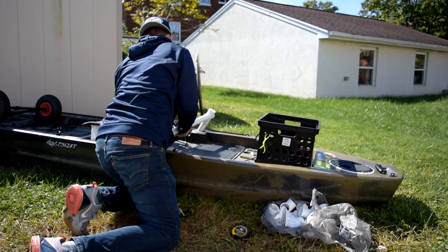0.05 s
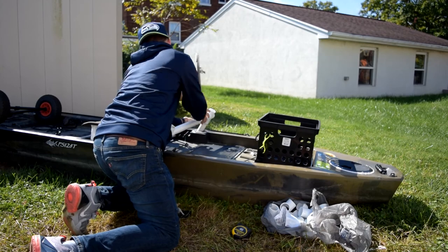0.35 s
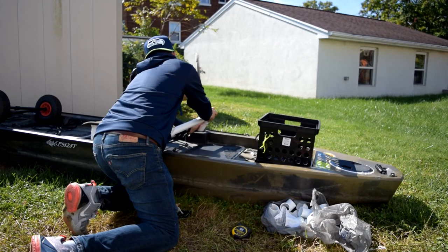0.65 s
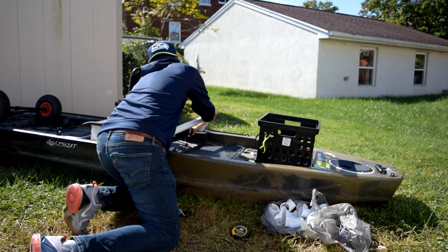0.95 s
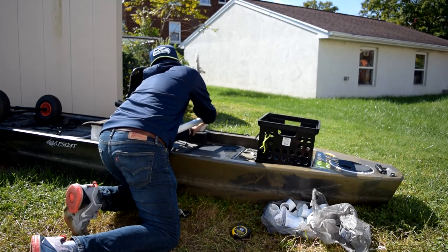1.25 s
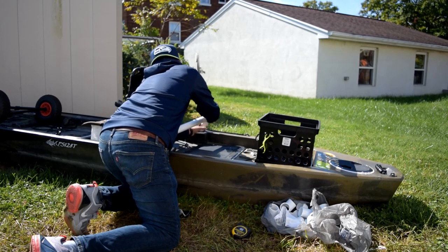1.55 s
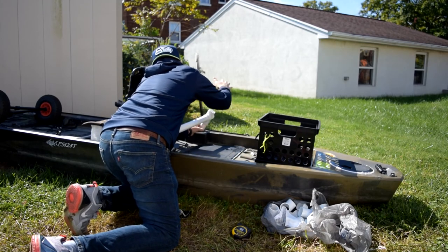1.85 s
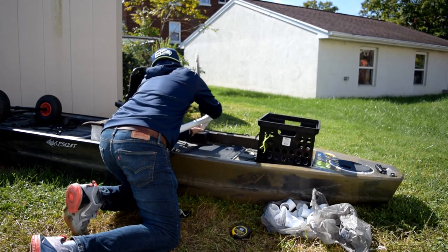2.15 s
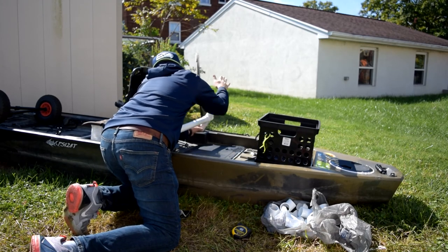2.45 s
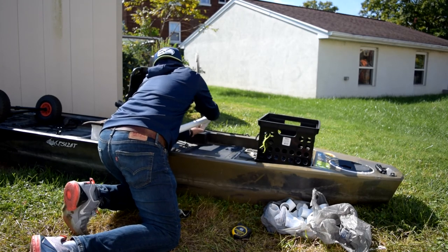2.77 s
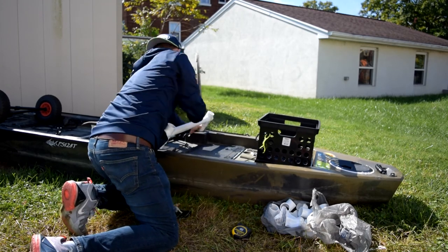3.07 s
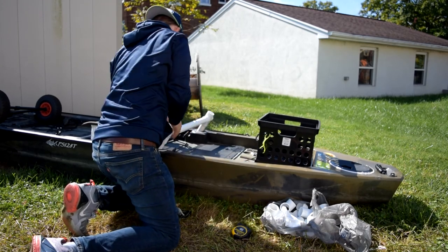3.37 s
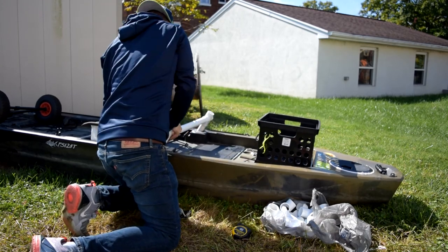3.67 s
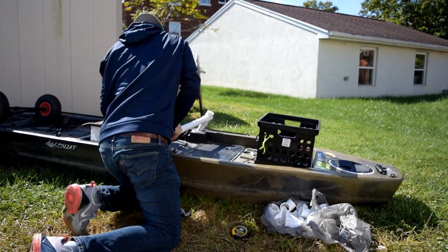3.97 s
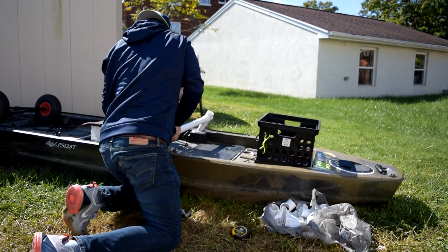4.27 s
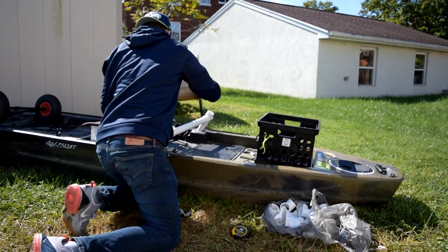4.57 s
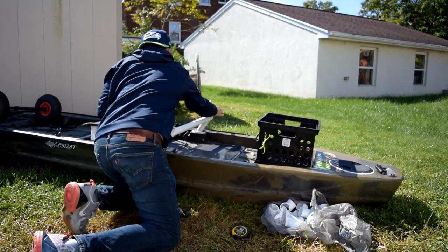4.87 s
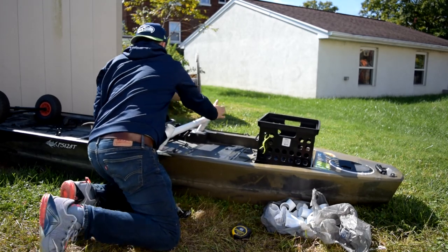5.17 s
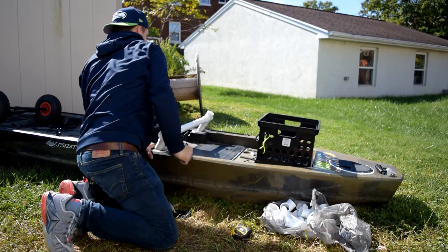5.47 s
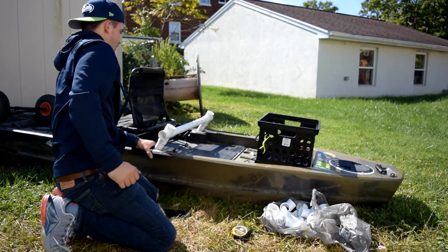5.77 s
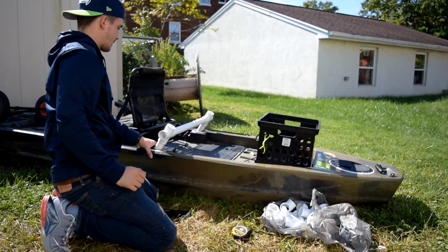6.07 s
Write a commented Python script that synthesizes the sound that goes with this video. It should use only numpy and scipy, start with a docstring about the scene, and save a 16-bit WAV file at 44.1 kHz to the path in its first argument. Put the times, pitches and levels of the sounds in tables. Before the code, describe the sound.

Hand blows drive plastic pipes home on a booming, rattling kayak, between smaller clicks, in a quiet yard with insects.

```python
"""On a lawn, over crickets and distant traffic, someone fits a PVC pipe frame onto a plastic kayak.
First the fittings slip and click into their seats, ringing the pipes. At 2 and 2.5 s two blows of the
hand drive them home, booming the hollow hull and rattling loose gear. A far songbird sings, two more
joints click and a car passes. A third blow lands at 4.9 s, and a jacket rustles after it.
The loudest hits overload the microphone."""
import sys
import numpy as np
from scipy import signal
from scipy.fft import rfft, irfft, next_fast_len
from scipy.io import wavfile

SR = 44100
rng = np.random.default_rng(int(sys.argv[2]) if len(sys.argv) > 2 else 0)


def put_to_file(sound):
    """Save the sound as 16-bit audio at rate SR, in the file named by the first command-line argument."""
    columns = np.atleast_2d(sound).T  # one column per channel
    safe = np.clip(columns, -1, 1)
    whole_steps = np.round(safe * 32767)
    wavfile.write(sys.argv[1], SR, whole_steps.astype(np.int16))


N = 279020
TIME = np.arange(N) / SR
RING = TIME[:SR * 3 // 4]  # time axis of a one-shot


def undb(db):
    """Decibels to gain."""
    return 10 ** (np.asarray(db) / 20)


def unit(x):
    """Scale to rms 1."""
    return x / np.sqrt(np.mean(x ** 2))


def unit_attack(x):
    """Scale a hit so that its first 15 ms have rms 1."""
    return x / np.sqrt(np.mean(x[:int(.015 * SR)] ** 2))


def fade(t60):
    """Exponential decay, 60 dB down after t60 seconds."""
    return np.exp(-np.log(1000) * RING / t60)


def add(out, s, x):
    """Mix x into out from time s."""
    i = int(s * SR)
    out[i:i + len(x)] += x[:len(out) - i]


def equalise(x, points, tilt_db=0):
    """Minimum-phase EQ through (Hz, dB) points, tilted by tilt_db per octave about 1 kHz."""
    size = next_fast_len(len(x) // 2 + 2048, real=True) * 2
    octave = np.log2(np.maximum(np.arange(size // 2 + 1) * SR / size, 1) / 1000)
    hz, db = np.transpose(points)
    gain = undb(np.interp(octave, np.log2(hz / 1000), db) + tilt_db * np.clip(octave, -2, 3))
    cepstrum = irfft(np.log(gain))[:size // 2]
    cepstrum[1:] *= 2
    return irfft(rfft(x, size) * np.exp(rfft(cepstrum, size)))[:len(x)]


def band(hz, width_hz):
    """Noise in one resonance, rms 1."""
    size = next_fast_len(N, real=True)
    f = np.arange(size // 2 + 1) * SR / size
    return unit(irfft(rfft(rng.standard_normal(size)) / (1 + (2 * (f - hz) / width_hz) ** 2))[:N])


def drift(rate):
    """Random modulator: rate new values a second, spread near 1."""
    knots = rng.standard_normal(4096)
    return np.interp(TIME * rate, np.arange(len(knots)), knots)


def modes(table):
    """One decaying sine per mode."""
    return np.array([undb(db) * fade(t60) * np.sin(2 * np.pi * hz * RING) for hz, db, t60 in table])


def strike(bank, push_s):
    """A half-sine push on a bank of modes; every spot drives them a little differently."""
    ring = undb(.7 * rng.standard_normal(len(bank))) @ bank
    push = np.sin(np.pi * np.minimum(RING / push_s, 1))
    return unit_attack(signal.fftconvolve(ring, push)[:len(RING)])


def whistles(notes, db, waver_share, arch_share=0.0149):
    """Thin tones that glide along a slight arch and flutter on their way."""
    out, waver, flutter = np.zeros(N), drift(200), drift(62)
    for s, length, middle_hz, glide_hz in notes:
        progress = np.linspace(0, 1, int(length * SR))
        arch = middle_hz * (1 - arch_share * (2 * progress - 1) ** 2) + glide_hz * (progress - .5)
        hz = arch * (1 + waver_share * waver[int(s * SR):][:len(progress)])
        envelope = np.sqrt(np.abs(np.sin(np.pi * progress)))
        add(out, s, envelope * np.sin(2 * np.pi * np.cumsum(hz) / SR))
    return out * undb(db + 2 * flutter)


# slapback off the house and shed: (delay [s], level [dB])
WALL_ECHOES = [(.033, -15), (.08, -24), (.097, -26)]
def yard(x, wet_db, t60=0.65, dull_hz=1800):
    """Walls send back a few dull echoes, trees and fences a thin tail."""
    dull = signal.sosfilt(signal.butter(1, dull_hz, fs=SR, output="sos"), x)
    tail = rng.standard_normal(len(RING)) * fade(t60)
    out = x + undb(wet_db) * signal.fftconvolve(dull, tail / np.linalg.norm(tail))[:N]
    for delay, db in WALL_ECHOES:
        add(out, delay, undb(db) * dull)
    return out


# EQ of the ambience bed: (frequency [Hz], relative level [dB])
AIR_EQ = [(15, -109), (25, 4.5), (70, -6), (113, -4.5), (179, -3), (298, -10.5), (435, -10.5), (498, -13),
          (1240, -16.5), (2650, -29.5), (3190, -29.5), (3860, -33.5), (7770, -39.5), (9140, -41.5),
          (15700, -50)]
def air(db=-47):
    """A soft, dark wash of air and roads."""
    return unit(equalise(rng.standard_normal(N), AIR_EQ)) * undb(db + .5 * drift(1.95))


# fader ride of the far engine: (time [s], level [dB])
ENGINE_FADER = [(0, -42), (.6, -49), (2.8, -47), (3.5, -57), (6.3, -68)]
def traffic(road_db=-54, tyre_db=-60.5, pass_db=-44, pass_s=4.066, pass_half_s=0.097):
    """Over the road's rumble an engine drones and leaves; a car passes with whining tyres."""
    engine = undb(np.interp(TIME, *np.transpose(ENGINE_FADER)))
    rumble = np.hypot(engine * undb(-4), undb(road_db))  # the engine's higher drone joins the road
    passing = undb(pass_db) / np.hypot(1, (TIME - pass_s) / pass_half_s)
    tyres = np.hypot(undb(tyre_db), passing)
    return engine * band(66.4, 6.3) + rumble * band(92, 35) + tyres * band(431, 92)


# long, faint tones: (start [s], length [s], middle pitch [Hz], glide [Hz])
WHINE_NOTES = [(.1, 0.33, 1240, -54), (.7, 0.68, 1640, 108), (1.8, .75, 1360, -69), (3.2, .42, 1073, 25)]
def far_whines():
    """Far-off whines waver at the back of the mix."""
    return whistles(WHINE_NOTES, db=-63.5, waver_share=0.0248)


# the songbird's phrase: (start [s], length [s], middle pitch [Hz], glide [Hz])
SONG_NOTES = [(2.847, 0.13, 2640, 158), (2.984, 0.068, 2430, -140), (3.13, 0.13, 2610, 121),
              (3.328, .12, 2160, 9), (3.465, .087, 2700, 137), (3.573, 0.071, 2370, 220)]
def songbird():
    """A far bird whistles six quick notes."""
    return whistles(SONG_NOTES, db=-55, waver_share=0.024)


# short bird calls: (start [s], length [s], middle pitch [Hz], glide [Hz])
CHIP_NOTES = [(1.918, 0.021, 3248, -450), (5.94, 0.025, 3260, -300)]
def chipping_bird():
    """A nearer bird gives two falling chips."""
    return whistles(CHIP_NOTES, db=-47, waver_share=0.015)


def high_insects(throb_rate=5.1, high_hz=9250, bend_hz=130, db=-66, stop_s=1.79):
    """A shrill buzz throbs, rising in pitch as it swells; a second stops early; a lower one stays."""
    phase = 2 * np.pi * np.cumsum(throb_rate * (1 + .12 * drift(3))) / SR
    bend = bend_hz * (np.sin(phase + 0.64) + drift(12))
    shifter = np.exp(2j * np.pi * np.cumsum(bend) / SR)
    buzz = np.real(signal.hilbert(band(high_hz, 620)) * shifter)
    throbbing = undb(db + 3.8 * np.sin(phase) + 1.5 * drift(6) + 2 * drift(120)) * buzz
    steady = undb(db + 2 * drift(117)) * band(9200, 910) * np.clip((stop_s - TIME) / 0.11, 0, 1)
    lower = undb(-78 + 3.5 * drift(40)) * band(5430, 300.4)
    return throbbing + steady + lower


# gate of the cricket's trills: (start [s], end [s])
TRILL_GATES = [(-.1, .22), (.6, 1.3), (1.85, 2.36), (3.2, 3.63), (4.2, 4.64), (4.93, 5.34), (5.78, 6.4)]
def cricket(pitch_hz=3130, stroke_rate=47, db=-56):
    """One cricket trills in bouts, each wing stroke sagging in pitch."""
    stroke = np.cumsum(stroke_rate * (1 + 0.074 * drift(2.5))) / SR % 1
    gate = sum(np.clip((TIME - start) / 0.071, 0, 1) * np.clip((end - TIME) / 0.0042, 0, 1)
               for start, end in TRILL_GATES)
    hz = pitch_hz * (1 + .11 * (.5 - stroke) + .015 * drift(400))
    pulse = np.sin(np.pi * stroke) ** 4 * undb(2 * drift(40))
    return undb(db) * gate * pulse * np.sin(2 * np.pi * np.cumsum(hz) / SR)


# jacket and knees moving: (peak time [s], half length [s], level [dB])
CLOTH_SWELLS = [(0.052, 0.066, -64), (0.494, 0.18, -65.5), (3.007, 0.34, -63.5), (4.105, .26, -65),
                (5.13, .13, -56.5), (5.703, 0.4, -67)]
# sharp ticks from the clothes: (time [s], level [dB])
CLOTH_TICKS = [(3.682, -59), (5.198, -49), (5.355, -47.5)]
# EQ of sliding fabric: (frequency [Hz], relative level [dB])
CLOTH_EQ = [(500, -18), (2000, -3), (5000, -0.5), (9000, -1.5), (14000, -6.5), (16000, -20)]
def jacket(grain_db=1, tick_t60=0.043):
    """Cloth slides in short swells of fine grains, with a few sharp ticks."""
    envelope = sum(undb(db) * np.exp(-((TIME - s) / half) ** 2) for s, half, db in CLOTH_SWELLS)
    for s, db in CLOTH_TICKS:
        add(envelope, s, undb(db) * fade(tick_t60))
    return envelope * unit(equalise(rng.standard_normal(N), CLOTH_EQ) * undb(grain_db * drift(280)))


# EQ of the loose gear: (frequency [Hz], relative level [dB])
GEAR_EQ = [(40, -29), (100, 19), (200, 4.5), (400, 3.5), (700, 2), (1100, -4.5), (2000, -8), (4000, -17),
           (8500, -28), (11500, -68), (16000, -50)]
def gear_rattle(t60, impact_rate=1100, build_s=0.011, buzz=0.25, split_hz=1100):
    """Loose gear chatters on the shaken deck: dense small impacts whose treble dies first."""
    impacts = (rng.random(len(RING)) < impact_rate / SR) + buzz
    chatter = unit(equalise(impacts * rng.standard_normal(len(RING)), GEAR_EQ))
    body = signal.sosfiltfilt(signal.butter(1, split_hz, fs=SR, output="sos"), chatter)
    treble = chatter - body
    attack = 1 - np.exp(-RING / build_s)
    return attack * (body * fade(t60) + treble * fade(t60 * 0.8)) / np.max(attack * fade(t60))


# ring of the pipe walls and bore: (frequency [Hz], relative level [dB], decay t60 [s])
PIPE_MODES = [(635.5, -6, 0.29), (736, -6, 0.13), (872, 7.5, 0.07), (980, 8, 0.021), (1197, 9, 0.025),
              (1454, 9, 0.018), (1604, 4, 0.042), (1895, -10, 0.035), (2090, 0, 0.022), (2630, -12, 0.024),
              (2924, -3, 0.035), (3430, -55, 0.015), (3950, -10, 0.052), (4240, 4.5, 0.007),
              (5720, 2, 0.022)]
# the plastic's crowded short modes as an EQ: (frequency [Hz], relative level [dB])
PLASTIC_EQ = [(40, -44), (160, 8.5), (400, 8.5), (800, -7), (1500, -9), (2500, -9.5), (4500, -19.5),
              (8500, -27.5), (11500, -37), (16000, -48)]
def pipe_clack(tilt_db, contact_hz, build_s=0.0023, grain_db=3, tail_db=-20, ring_db=-3):
    """A brief gritty crack at a fitting rings the tube; a softer contact has a lower cut-off."""
    grit = undb(grain_db * np.repeat(rng.standard_normal(len(RING)), 48)[:len(RING)])  # 1 ms grains
    attack = 1 - np.exp(-RING / build_s)
    crack = rng.standard_normal(len(RING)) * grit * fade(0.017) * attack
    tail = rng.standard_normal(len(RING)) * undb(tail_db) * fade(.14)
    ring = signal.fftconvolve(crack, modes(PIPE_MODES).sum(axis=0))[:len(RING)]
    plastic = equalise(crack + tail, PLASTIC_EQ, tilt_db)
    clack = unit_attack(plastic) + undb(ring_db) * unit_attack(ring)
    return unit_attack(signal.sosfilt(signal.butter(2, contact_hz, fs=SR, output="sos"), clack))


# thud of the frame flexing on its mounts: (frequency [Hz], relative level [dB], decay t60 [s])
FRAME_MODES = [(131, -25, 0.18), (165, 8.5, 0.24), (195.9, 0, 0.33), (242, -9.5, 0.4), (302, -15, 0.12),
               (355, -8, 0.24), (426.8, -1.5, 0.17), (520, -13, 0.18)]
def joint_hit(clack_db, thud_db, tilt_db, contact_hz, contacts=1, rebound_db=0, rebound_s=.0115):
    """A joint strikes, flexing the frame and ringing the pipe; any rebound is thinner and brighter."""
    out = undb(thud_db) * strike(modes(FRAME_MODES), push_s=0.0013)
    for k in range(contacts):
        clack = pipe_clack(tilt_db + 3 * k, contact_hz)
        add(out, k * rebound_s, undb(clack_db + k * rebound_db) * clack)
    return out


# fittings pushed home: (time [s], clack level [dB], contact cut-off [Hz], thud level [dB],
# slip lead [s], slip level re the seating hit [dB])
FITTING_CUES = [(.697, -31.5, 7500, -34, .012, -8.5), (0.877, -41, 2480, -43, 0.01, -5.5),
                (1.083, -39, 2350, -38, 0.0041, -13), (1.2034, -25, 8300, -26, 0.014, -13),
                (1.578, -55, 556, -38, 0.0043, -14), (2.829, -46, 3980, -41, .003, -7),
                (3.06, -48, 905, -42, 0.00264, -11), (3.8338, -24.5, 7840, -23.5, 0.0014, -32),
                (3.941, -33.5, 1480, -28, 0.012, -2.5)]
def fittings():
    """Each fitting slips with a soft contact, then seats, springs back and strikes again, weaker."""
    out = np.zeros(N)
    for s, clack_db, contact_hz, thud_db, lead_s, slip_db in FITTING_CUES:
        slip = joint_hit(clack_db + slip_db, thud_db + slip_db, tilt_db=1, contact_hz=2670)
        seat = joint_hit(clack_db, thud_db, tilt_db=1, contact_hz=contact_hz, contacts=2, rebound_db=-11.5)
        add(out, s - lead_s, slip)
        add(out, s, seat)
    return out


# boom of the hollow hull: (frequency [Hz], relative level [dB], decay t60 [s])
HULL_MODES = [(64.84, -18.5, 0.53), (91.4, -6.5, 0.45), (109, -7, 0.47), (119.5, 4, 0.055),
              (136.4, -4.5, 0.32), (167.2, -14, 0.14), (183.7, -4.5, 0.15), (209.2, -10, 0.32),
              (225.8, -9, 0.334), (259.1, -12.5, 0.32), (295.7, -13.5, 0.28), (352.6, -6, 0.22),
              (395, -7, 0.14), (458.8, -8.5, 0.26), (511, -17.5, 0.25), (585, -8, 0.19), (677.5, -10, 0.24)]
def hull_boom():
    """The hand's push rings the hull; some panels swing towards the microphone, others away."""
    polarity = np.where(np.arange(len(HULL_MODES)) % 3 == 1, 1, -1)
    return strike(modes(HULL_MODES) * polarity[:, None], push_s=0.0019)


# the big hits: (time [s], boom level [dB], rattle level [dB], rattle t60 [s], clack level [dB],
# change per rebound [dB], thud level [dB])
BLOW_CUES = [(1.9888, -9, -16, 0.26, -22, -6, -24), (2.528, -5.5, -14, 0.36, -12.5, -9, -17.5),
             (4.8883, -6, -13.5, 0.3, -23.5, -.5, -10.5)]
def hand_blows(hull_lag_s=.0022):
    """The hand drives a joint home with a hard clack; just after, the hull booms and the gear rattles."""
    out = np.zeros(N)
    for s, boom_db, rattle_db, rattle_t60, clack_db, rebound_db, thud_db in BLOW_CUES:
        hit = joint_hit(clack_db, thud_db, tilt_db=4, contact_hz=12900, contacts=3, rebound_db=rebound_db)
        body = undb(boom_db) * hull_boom() + undb(rattle_db) * gear_rattle(rattle_t60)
        add(out, s, hit)
        add(out, s + hull_lag_s, body)
    return out


def scene():
    """Mono mix: the garden set back in reverb, the work close and nearly dry."""
    far = songbird() + far_whines()
    near = cricket() + chipping_bird()
    garden = yard(far, wet_db=7.5) + yard(near, wet_db=-0.5) + high_insects()
    work = yard(fittings() + hand_blows(), wet_db=-16, t60=0.39)
    return (work + garden + jacket() + air() + traffic())[None]


def record(dry, low_cut_hz=45, high_cut_hz=15700):
    """The microphone sheds the deep bass, the loudest blows clip flat, the top is cut."""
    lean = signal.sosfilt(signal.butter(3, low_cut_hz, "high", fs=SR, output="sos"), dry)
    clipped = np.clip(lean, -1, 1)
    return signal.sosfilt(signal.ellip(9, .1, 70, high_cut_hz, fs=SR, output="sos"), clipped)


dry = scene()
out = record(dry)
put_to_file(out)
```